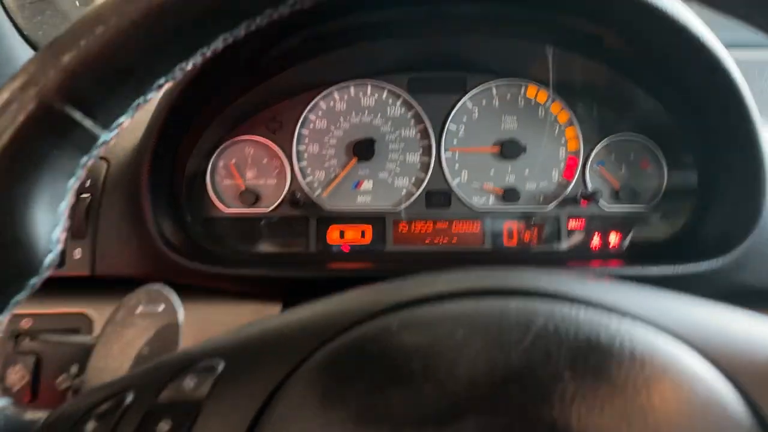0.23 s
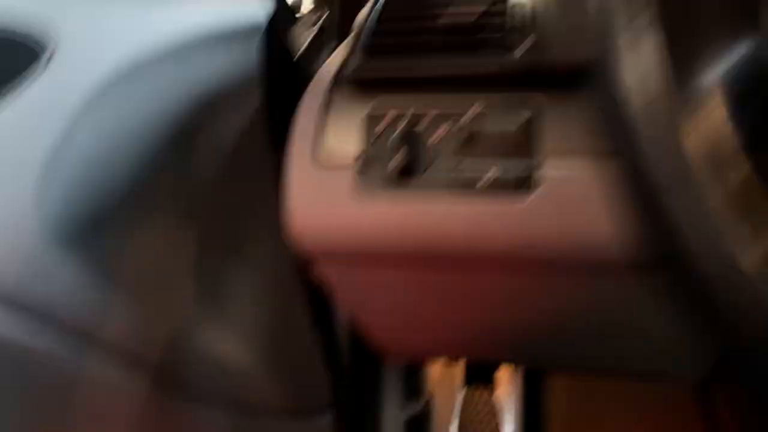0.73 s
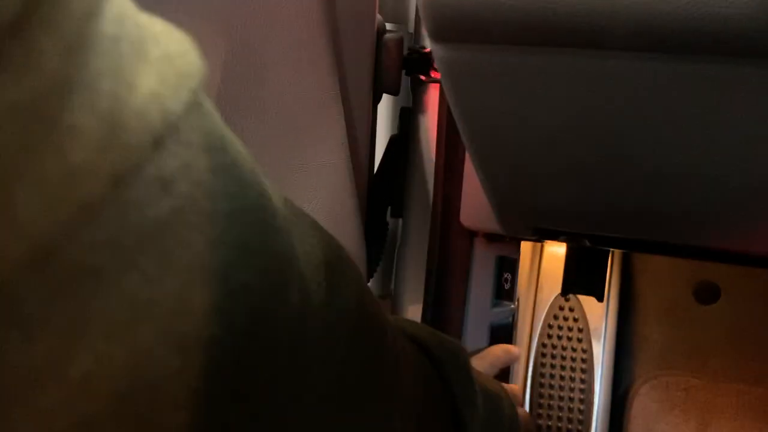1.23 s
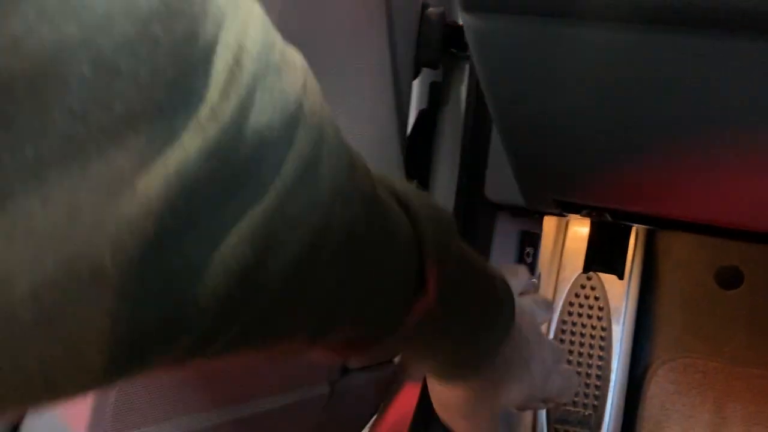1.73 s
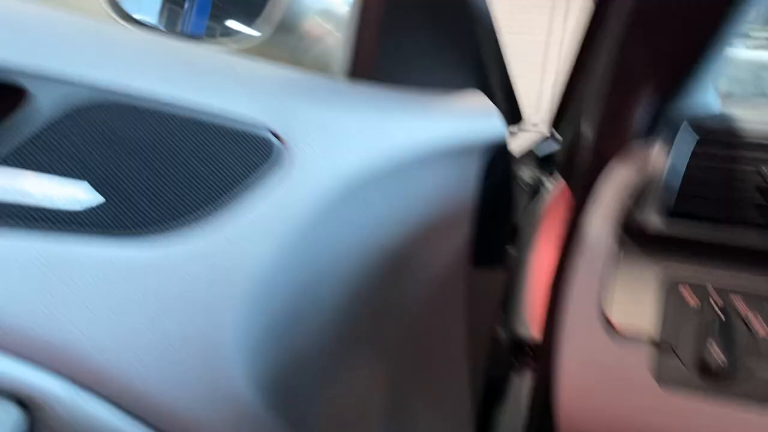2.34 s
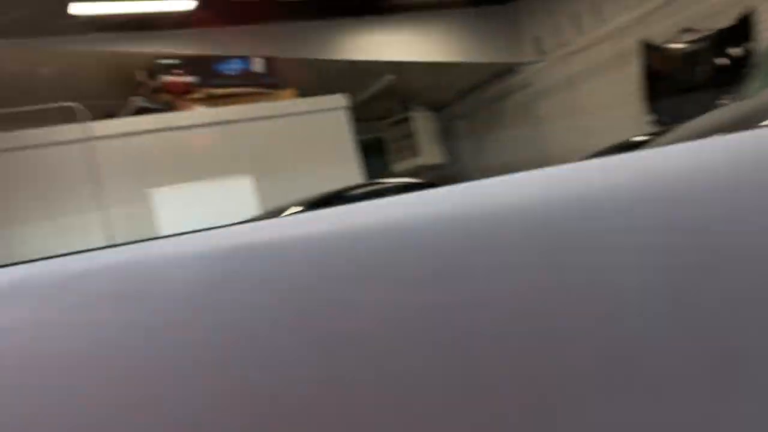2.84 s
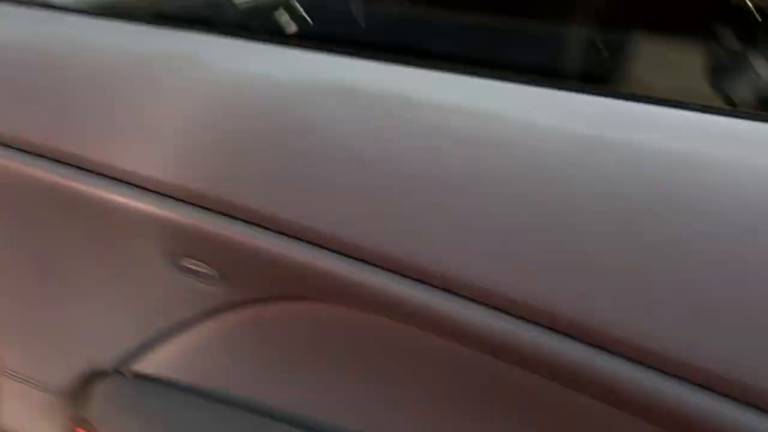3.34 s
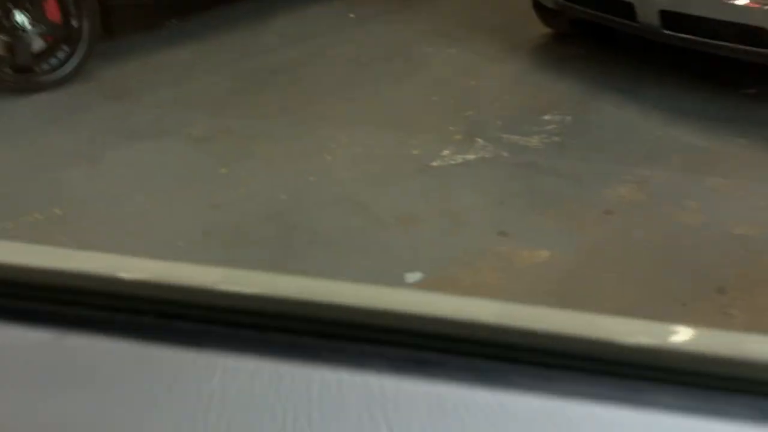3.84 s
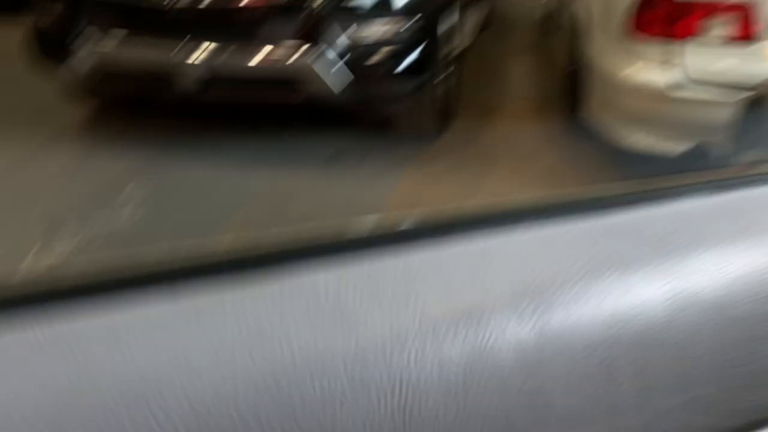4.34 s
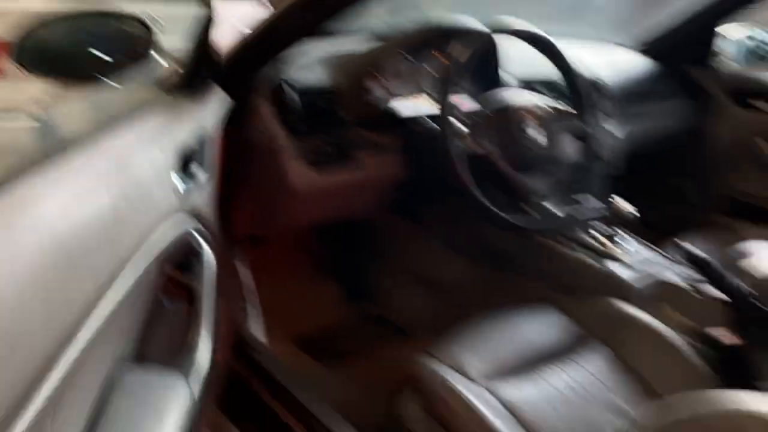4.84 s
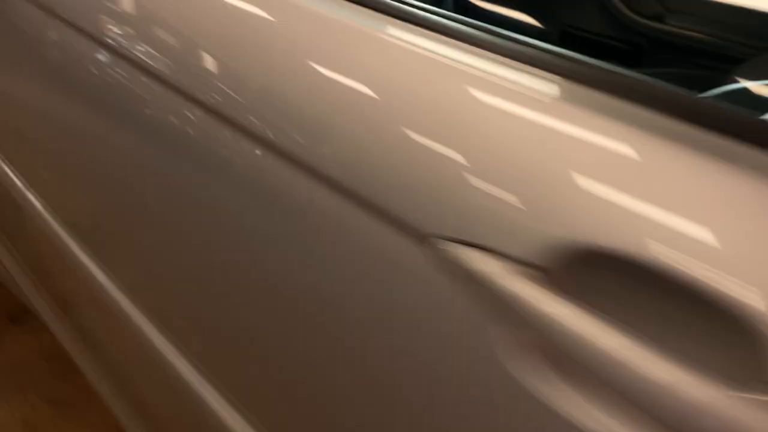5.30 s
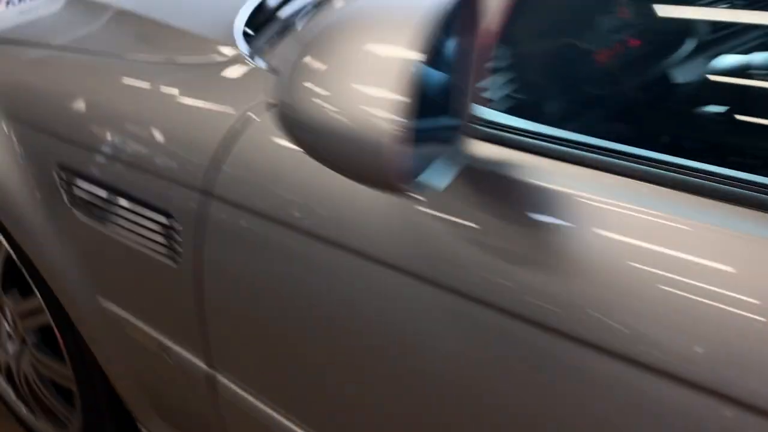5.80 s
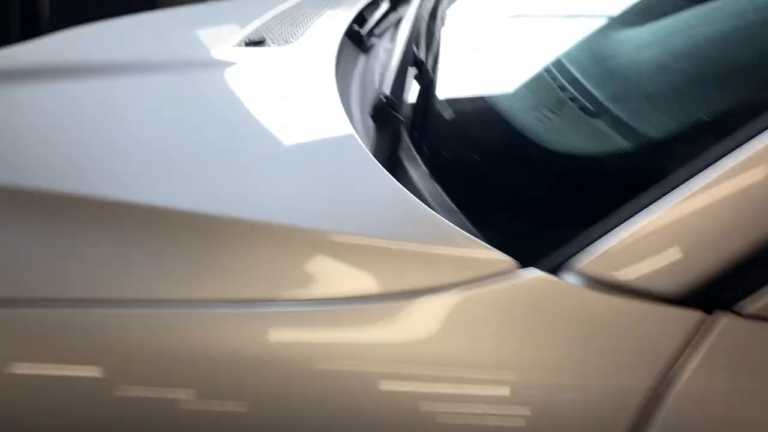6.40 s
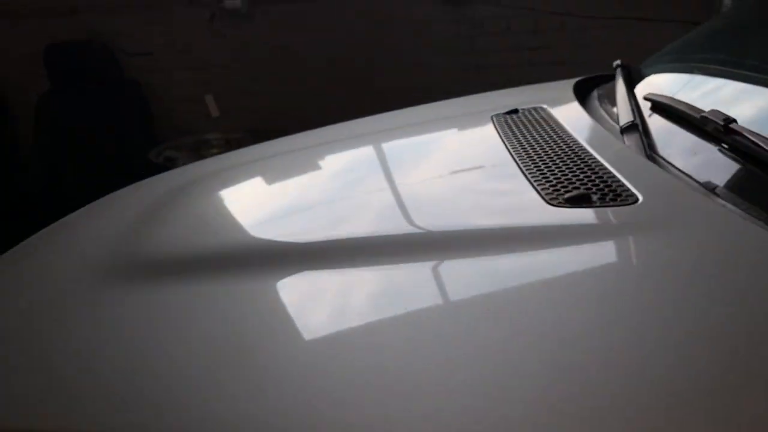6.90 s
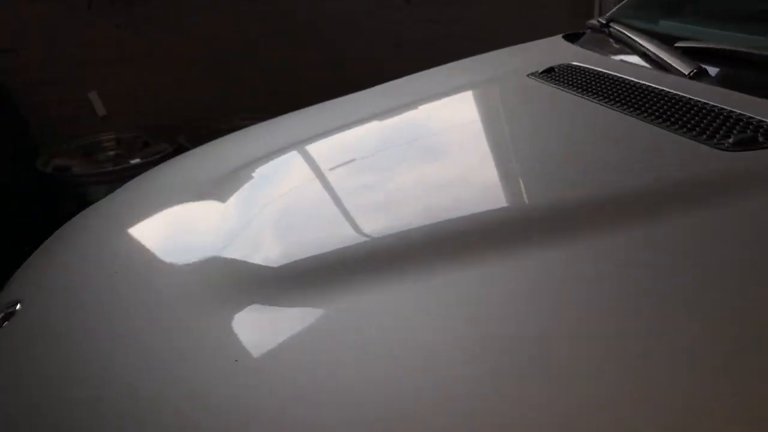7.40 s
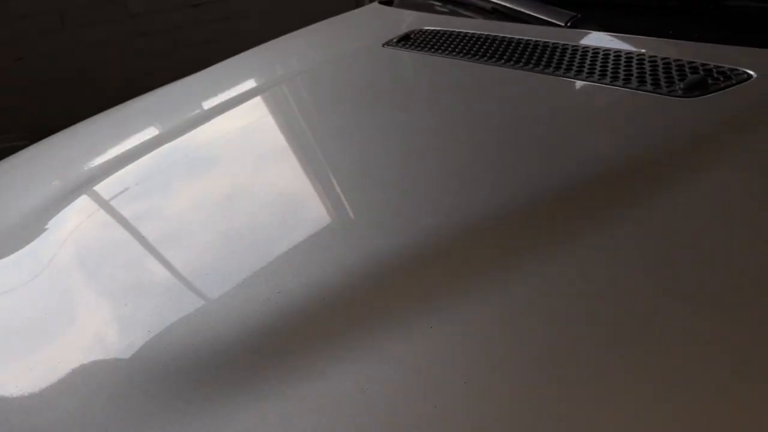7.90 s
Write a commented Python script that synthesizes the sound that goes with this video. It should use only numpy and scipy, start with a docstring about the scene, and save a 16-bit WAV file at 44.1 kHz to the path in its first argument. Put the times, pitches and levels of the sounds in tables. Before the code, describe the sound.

A car engine idles with a deep hum while a hood release snaps, a door slams, and the engine turns brighter outside.

```python
"""Idling straight-six, seat to bonnet.

A straight-six idles in a workshop while a phone is carried from the driver's seat round to the bonnet.
A sleeve brushes the trim, the bonnet lever creaks and snaps, the door is knocked and then slammed.
The firing boom fills the car; outside, the valve gear brightens and the belt whistles.
The phone's limiter ducks after the loud blows."""
import sys
import numpy as np
from scipy import signal
from scipy.fft import rfft, irfft, next_fast_len
from scipy.io import wavfile
from scipy.ndimage import uniform_filter1d, minimum_filter1d, map_coordinates

SR = 44100
rng = np.random.default_rng(int(sys.argv[2]) if len(sys.argv) > 2 else 0)


def transcribe(u):
    """Save the signal u as a 16-bit wav file named by the first command-line argument.

    u: samples, shape (n,) or (channels, n), limited to [-1, 1]; the rate is SR.
    q: integer samples, one column per channel.
    """
    v = np.clip(np.atleast_2d(u).T, -1, 1)
    q = np.round(v * 32767).astype(np.int16)
    wavfile.write(sys.argv[1], SR, q)


N = 359415
TIME = np.arange(N) / SR
SIDES = np.array([[1], [-1]])  # left, right

# The phone's path. Each row: time in seconds, mechanical noise in dB, nearness to the bonnet 0-1.
WALK = [(0, -49, 0.52), (.45, -49, 0.17), (.8, -43, 0.03), (1.4, -46, 0.14), (2.3, -41.5, 0.08),
        (3.2, -41.5, 0.06), (3.7, -44, 0.6), (4.4, -42.5, 0.43), (5.2, -41.5, 0.52), (5.9, -40, 0.52),
        (7.2, -40, 0.96), (8.15, -39.5, 1)]


def exhaust(firings):
    """The firing tone and its orders, body shudder, and a rumble that puffs at each firing."""
    # Firing tone along the walk. Each row: time in seconds, level in dB.
    boom_levels = [(0, -18.5), (.3, -18), (.75, -24.5), (1.25, -20), (1.65, -26.5), (1.9, -48),
                   (2.25, -20.5), (2.55, -28.5), (2.85, -21.5), (3.35, -19.5), (4.3, -21), (5.45, -17),
                   (5.9, -22), (6.7, -18), (7, -19.5), (7.5, -17.5), (8.15, -18.5)]
    # Overtones. Each row: multiple of the firing rate, cabin level in dB, bonnet level in dB.
    overtones = [(2, -38, -43), (2.5, -40.5, -30), (3, -34, -38), (4, -47.5, -48), (5, -47.5, -45)]
    # Uneven cylinders and belt-driven pumps. Each row: multiple of the firing rate, level in dB.
    weak_orders = [(.5, -56), (1.499, -49), (3.5, -50.5), (4.5, -53.5), (5.34, -51), (5.5, -62.5),
                   (6, -57.5), (6.36, -54.5), (7.78, -60.5)]
    # Rumble spectrum. Each row: frequency in Hz, level in dB.
    rumble_shape = [(18, -54), (31, -26), (44, -16), (75, -13.5), (107, -15), (167, -26), (217, -13),
                    (291, -22.5), (420, -28), (600, -32), (780, -68), (1320, -120)]
    # The left port hears the exhaust later. Each row: frequency in Hz, lag in radians.
    left_lag = [(57, 0.52), (170, 0.78), (280, 0.96), (420, 1.47)]
    level_db, near = curves(WALK)
    shudder = amp(-26) * (1 - near ** 3) * noise(hump(centre_hz=78, octaves=0.52), spread=0.12)[0]
    boom = amp(curves(boom_levels)[0]) * (tone(firings, flutter_db=0.5, drift_rad=0.0075) + shudder)
    for order, cabin_db, bonnet_db in overtones:
        # Unequal cylinders throb once per six firings.
        lope = 1 + 0.23 * np.cos(2 * np.pi * (firings / 6 + rng.random()))
        db = cabin_db + (bonnet_db - cabin_db) * near ** 3 + standing_wave_db(order)
        db += 0.16 * wobble(3.16)
        boom += amp(db) * lope * tone(order * firings, flutter_db=1.7, drift_rad=0.024)
    for order, db in weak_orders:
        boom += amp(db + standing_wave_db(order)) * tone(order * firings, flutter_db=4, drift_rad=0.16)
    puffs = 1 + 0.5 * np.cos(2 * np.pi * firings)
    footwell_db = 11.5 * passing(at_s=1.48, half_s=0.87)  # rumble gathers under the dashboard
    rumble = unit(puffs * noise(lambda f: along(rumble_shape, f), spread=0.18))
    rumble *= amp(level_db + 0.3 + footwell_db)
    left_db = -5.5
    return filtered(boom + rumble,
                    lambda f: amp(SIDES * left_db / 2) * np.exp(-0.5j * SIDES * along(left_lag, f)))


def standing_wave_db(order):
    """An engine order swells or sinks as the phone moves through its standing wave."""
    # Loud and dead spots. Each row: order to the nearest half, time and half length in seconds, gain in dB.
    spots = [(2, .05, 0.46, -18), (2, 2.26, 0.28, -5), (2, 6.28, 0.61, 11.5), (2, 8.06, 0.55, 11.5),
             (3, 0.52, 0.23, -15.5), (3, 1.02, 0.41, 4), (4, 1.21, 0.43, 8.5), (4, 3.26, 0.45, 3.5),
             (4, 6.9, 0.49, 13), (4.5, 6.65, 0.89, 6), (5, 0.032, 0.23, 6.5), (5, 4.35, 0.25, 6),
             (5.5, 5.38, 0.58, 8), (5.5, 0.42, 0.75, -12), (6.5, 1.23, 0.53, 12.5), (6.5, 5.4, 0.85, 9.5)]
    return sum(db * passing(at_s, half_s) for multiple, at_s, half_s, db in spots
               if round(2 * multiple) == round(2 * order))


def machinery(firings):
    """Fan and belt rush, valve clatter and pulley whines open up towards the bonnet."""
    # Rush at the seat. Each row: frequency in Hz, level in dB.
    cabin_shape = [(150, -28), (400, -1.5), (600, -6.5), (1000, -6), (1500, -9.5), (2100, -10), (3000, -15),
                   (4500, -15), (6000, -22), (10000, -21), (15500, -25)]
    # Rush at the bonnet. Each row: frequency in Hz, level in dB.
    bay_shape = [(150, -44), (400, -6), (600, -4.5), (750, -7.5), (1100, -6), (1800, -7.5), (2800, -12),
                 (4200, -12.5), (5500, -20), (10000, -16.5), (15500, -21)]
    # Microphone pair. Each row: frequency in Hz, likeness 0-1, left lead in radians, left level in dB.
    engine_ports = [(300, 0.18, 6, -10.5), (645, 0.68, 2, -3), (1060, 0.64, 1.8, -1.5),
                    (1850, 0.15, 4.34, -4.5), (3870, 0.11, 12.13, -2), (6530, 0.33, 19.4, -4),
                    (8000, 0.13, 23, -3), (8840, 0.85, 20.6, 0.5), (9920, 0.8, 19.56, -1),
                    (12100, 0.83, 15.3, 0), (13100, .94, 13.9, 2), (14000, 1, 13.5, -1)]
    level_db, near = curves(WALK)
    rush = np.sqrt(1 - near) * hiss(cabin_shape) + np.sqrt(near) * hiss(bay_shape)
    valves = amp(-6 + 2.5 * near) * valve_gear(firings)
    clatter = amp(level_db + 0.28 * wobble(4)) * (rush + valves)
    whine = near ** 2 * pulleys(firings)
    diffuse = ports(reflected(clatter, patchy_db=2.5), engine_ports)
    return diffuse + place(whine + belt(near), left_db=-3, lead_ms=0.053)


def valve_gear(firings, pattern_db=5, scatter_db=4, t60_s=0.055):
    """Twelve valves, each with its own strength, close once per six firings and ring the head."""
    # Block and valve cover modes. Each row: frequency in Hz, width in Hz, gain in dB.
    head_modes = [(569, 32, 5.5), (892, 36, -1.5), (1380, 110, -0.5), (1630, 75, -0.5), (1800, 19, -0.5),
                  (2160, 53, -6), (2504, 46, -4.5), (2836, 56, -4.5), (4360, 2000, -17.5)]
    closing = np.floor(2 * firings + 0.015 * wobble(110)).astype(int)
    at = np.flatnonzero(np.diff(closing))
    valve_db = pattern_db * rng.uniform(-1.7, 1, size=12)
    taps = np.zeros(N)
    taps[at] = amp(valve_db[closing[at] % 12] + scatter_db * rng.uniform(-1.8, 1, len(at)))
    envelope = signal.fftconvolve(taps, decay(TIME[:SR // 20], t60_s))[:N]
    rattle = envelope * rng.standard_normal((2, N))
    return unit(sum(amp(1.2 * wobble(7)) * ring(rattle, [mode]) for mode in head_modes))


def pulleys(firings, fade_db=9):
    """Belt-driven parts whine, each weaker away from its own place."""
    # Whines. Each row: multiple of the firing rate, level in dB, closest approach in seconds.
    whines = [(10.22, -52, 7.8), (10.62, -53.5, 6.9), (14.72, -54.5, 7.44), (16.04, -51.5, 6.71),
              (19.1, -59, 7.3), (22, -63.5, 7.2), (23.2, -56.5, 6.45), (24.4, -55, 7.4), (24.8, -61, 6.6),
              (28.9, -54, 6.8), (29.9, -62, 7.0), (31.6, -57.5, 7.2), (38.44, -57, 7.5)]
    out = np.zeros(N)
    for order, db, nearest_s in whines:
        gain = amp(db + fade_db * (passing(nearest_s, half_s=0.53) - 1) + 1.1 * wobble(4))
        out += gain * tone(order * firings, flutter_db=2.5, drift_rad=0.6)
    return out


def belt(near, flap_hz=15, chirps_per_s=13):
    """The drive belt whistles, flaps, and chirps as it slips on its pulleys."""
    # Whistle. Each row: time in seconds, pitch in Hz, level in dB.
    whistle = [(2.8, 2180, -76), (4.2, 2168, -58), (5.3, 2170, -61), (5.9, 2194, -57), (7.1, 2175, -59),
               (7.45, 2160, -60), (7.58, 2145, -48), (7.79, 2145, -48.5), (8.15, 2146, -47)]
    # Clearest chirps. Each row: centre in seconds, level in dB, half length in seconds, pitch in Hz.
    chirps = [(3.28, -48.5, .04, 2180), (3.46, -48.5, .022, 2180), (7.0, -49, 0.047, 2190),
              (7.155, -49, .04, 1810), (7.271, -45, 0.023, 1770), (7.92, -55, .1, 2845)]
    hz, db = curves(whistle)
    flap = 1 + 0.36 * np.sin(2 * np.pi * flap_hz * TIME + 1.7 * wobble(14))
    cycles = np.cumsum(hz + 15 * wobble(90)) / SR
    out = amp(db) * flap * tone(cycles, flutter_db=0.3, drift_rad=0.35)
    for at_s, db, half_s, hz in chirps:
        add(out, at_s - 2 * half_s, chirp(db, half_s, hz, octaves_per_s=0))
    # Fainter ones come at random outside the car.
    for when, strength, length, pitch, glide in rng.uniform(-1, 1, (int(chirps_per_s * N / SR), 5)):
        at = int((when + 1) / 2 * (N - 1))
        sound = chirp(db=-54 - 4 * strength, half_s=0.0216 * 2 ** (length / 2),
                      hz=1604 * 2 ** (0.39 * pitch), octaves_per_s=1.23 * glide)
        add(out, at / SR, min(1.64 * near[at], 1) ** 3 * sound)
    return out


def chirp(db, half_s, hz, octaves_per_s):
    """One belt slip: a short, slightly rough squeak."""
    t = np.arange(-2 * half_s, 2 * half_s, 1 / SR)
    phase = 2 * np.pi * np.cumsum(hz * 2 ** (octaves_per_s * t)) / SR + 0.37 * wobble(162, len(t))
    return np.sqrt(2) * amp(db) * np.exp(-(t / half_s) ** 2) * np.sin(phase)


def door_latch(spring_octaves=0.9, attack_s=0.00046):
    """The sprung steel latch strikes, then snaps home: two quick bursts of contacts."""
    # Contacts. Each row: start in seconds, level in dB, t60 in seconds, spring ring in dB, its pitch in Hz.
    contacts = [(5.508, -5.5, 0.058, 7.5, 3000), (5.515, -3.5, 0.059, 8, 5660),
                (5.523, -6.5, 0.084, 3, 3800), (5.529, -9, 0.067, 5, 500), (5.545, -5.5, 0.043, 11, 9000),
                (5.548, -6.5, .06, 7.5, 3400), (5.555, -15.5, 0.22, 2.5, 3600)]
    # Steel spectrum. Each row: frequency in Hz, level in dB.
    steel = [(150, 7), (300, 4), (800, -2), (1700, -5.5), (2600, -7.5), (4000, -11), (6300, -16.5),
             (8000, -19), (10200, -17), (15500, -23)]
    out, t = np.zeros((2, N)), TIME[:SR // 4]
    for start_s, db, t60_s, ring_db, spring_hz in contacts:
        spring = lambda f: ring_db * np.exp(-(np.log2((f + 1) / spring_hz) / spring_octaves) ** 2)
        burst = noise(lambda f: along(steel, f) + spring(f), spread=1, size=len(t))
        add(out, start_s, amp(db) * decay(t, t60_s) * (1 - np.exp(-t / attack_s)) * burst)
    return out


def bodywork():
    """Blows ring the door panel and thud through the body shell."""
    # Blows on the door. Each row: start in seconds, level in dB.
    knocks = [(1.727, -17), (1.79, -23.5), (3.911, -2.5), (3.989, -25), (4.018, -24), (4.044, -22),
              (5.509, -8.5), (5.54, -7.5), (5.572, -20)]
    # Door panel modes. Each row: frequency in Hz, width in Hz, gain in dB.
    panel_modes = [(198, 21, 5), (246.2, 18, 7.5), (408, 28, 3.5), (530, 29, 3), (656, 51, 0.5),
                   (914, 32, -9.5)]
    # Blows on the shell. Each row: start in seconds, level in dB.
    thuds = [(1.745, -12), (1.842, -13), (3.915, -12), (4.0, -13.5), (4.052, -12.5), (5.52, -17),
             (5.539, -4.5), (5.557, -10)]
    # Shell modes. Each row: frequency in Hz, width in Hz, gain in dB.
    shell_modes = [(70.6, 12, -0.5), (94, 28.2, 1), (163, 33, -8), (257.5, 19, -5.5), (390, 185, -12.5)]
    door = blows(knocks, panel_modes, rattle=0.12, rebound_s=0.0165)
    return door + blows(thuds, shell_modes, rattle=0.29, rebound_s=0.017)


def blows(rows, modes, rattle, rebound_s, rebound_db=-0.5):
    """Each blow rings a body, rattles loose trim, and lands again as the part springs back."""
    out, t = np.zeros(N), TIME[:SR // 3]
    for start_s, db in rows:
        for delay_s, loss_db in ((0, 0), (rebound_s, rebound_db)):
            push = np.exp(-t / 0.0025) + rattle * rng.standard_normal(len(t)) * decay(t, t60_s=0.46)
            sound = ring(push, modes)
            add(out, start_s + delay_s, amp(db + loss_db) * sound / np.abs(sound).max())
    return out


def bonnet_catch():
    """The catch lets go in a rush of contacts that ring the lever's steel bracket."""
    # Contacts. Each row: start in seconds, level in dB.
    contacts = [(1.921, -11), (1.928, -8.5), (1.931, 16), (1.934, 14.5), (1.9375, 11.5)]
    # Bracket modes. Each row: frequency in Hz, width in Hz, gain in dB.
    bracket_modes = [(168, 100, -1), (300, 147, -1.5), (526, 95, 0.5), (1351, 180, -4), (1740, 125, -1),
                     (2130, 150, -4.5), (2620, 140, 1.5), (3460, 380, -8.5), (4430, 1100, -17),
                     (9000, 7200, -26.5)]
    return place(struck(contacts, bracket_modes, buzz=0.28, buzz_t60_s=0.033), left_db=-6)


def bonnet_cable(sag_octaves_per_s=1.53):
    """The cable sticks and slips in rough squeaks, each sinking as the slip slows."""
    # Squeaks. Each row: centre in seconds, level in dB, half length in seconds, tilt in dB per octave.
    creaks = [(1.553, -38, 0.0051, -2), (1.603, -34.5, 0.017, -5), (1.63, -35, 0.015, 3),
              (1.677, -41.5, 0.021, 6), (1.731, -29, .011, -3), (1.771, -34.5, 0.016, -18)]
    # Cable tones. Each row: frequency in Hz, level in dB.
    partials = [(1385, 5), (1680, 1), (2580, -6.5), (2980, -13)]
    out = np.zeros(N)
    for at_s, db, half_s, tilt_db in creaks:
        t = np.arange(-2 * half_s, 2 * half_s, 1 / SR)
        wander = 1 + 0.026 * wobble(716, len(t)) + 0.0254 * wobble(60, len(t))
        slip = np.cumsum(2 ** (-sag_octaves_per_s * t) * wander) / SR
        squeak = sum(amp(partial_db + tilt_db * np.log2(hz)) * np.sin(2 * np.pi * hz * slip)
                     for hz, partial_db in partials)
        rough = unit(squeak * amp(2.5 * wobble(340, len(t))))
        add(out, at_s - 2 * half_s, amp(db) * np.exp(-(t / half_s) ** 2) * rough)
    return place(out, left_db=-7)


def trim_snap(start_s=2.5876, db=-6):
    """A plastic fastener lets go and rings the door trim."""
    # Trim modes. Each row: frequency in Hz, width in Hz, gain in dB.
    trim_modes = [(610, 230, -7.5), (1050, 250, -6), (1300, 150, 0.5), (2200, 290, 3), (3370, 580, -6),
                  (4800, 540, -8), (9000, 5400, -13)]
    return struck([(start_s, db)], trim_modes, buzz=0.16, buzz_t60_s=0.037)


def struck(rows, modes, buzz, buzz_t60_s):
    """Hard contacts, each with a brief buzz, ring a body."""
    out, t = np.zeros((2, N)), TIME[:SR // 8]
    for start_s, db in rows:
        push = (t == 0) + buzz * rng.standard_normal((2, len(t))) * decay(t, buzz_t60_s)
        sound = ring(push, modes)
        add(out, start_s, amp(db) * sound / np.abs(sound).max())
    return out


def handling(snags_per_s=27):
    """Taps on plastic, and grainy strokes of cloth and hand that snag on trim and door seal."""
    # Taps. Each row: start in seconds, level in dB, centre in Hz.
    taps = [(0.27, -33.5, 5700), (0.2966, -29, 1180), (.7133, -36.5, 1560), (0.772, -26, 1170),
            (.8355, -34, 1700), (0.843, -34, 8000), (0.895, -30.5, 1090), (.9318, -39, 1120),
            (0.949, -34, 2200), (.967, -43, 7000), (1.012, -29.5, 940), (1.107, -29, 4500),
            (1.14, -30, 900), (1.158, -31, 2400), (1.2246, -15, 2100), (1.3712, -30.5, 950),
            (1.567, -27, 1610), (1.59, -29, 1710), (1.720, -25, 2020), (2.174, -26, 890), (2.235, -33, 850),
            (2.254, -32, 950), (2.273, -28.5, 930), (2.296, -37, 1050), (2.33, -33, 1100),
            (2.359, -37, 1300), (2.395, -30, 1900), (2.422, -31, 900), (2.442, -32, 950),
            (2.677, -34.5, 3000), (2.787, -36, 1000), (2.9181, -28, 920), (2.968, -34, 1800),
            (3.2296, -31, 2200), (3.915, -21.5, 550), (3.9903, -26.5, 794), (4.702, -31, 1100)]
    # Strokes. Each row: time in seconds, level in dB, half length in seconds, centre in Hz, width in octaves.
    strokes = [(0.865, -42.5, 0.088, 1630, 1.2), (1.156, -40, 0.058, 1880, 2.2),
               (1.621, -46, 0.04, 1960, 0.69), (1.769, -36.5, 0.053, 700, 0.64),
               (2.283, -43, 0.14, 900, 0.33), (2.421, -45.5, 0.037, 3200, 0.7),
               (2.92, -50, 0.088, 1820, 0.59), (3.918, -36.5, 0.0091, 3180, 0.3),
               (4.007, -25, .011, 4900, 1.7), (4.023, -30.5, .023, 4070, 1.4),
               (4.569, -36.5, 0.054, 2200, 1.8), (4.721, -38, 0.059, 1100, 0.19),
               (4.76, -44, 0.12, 4530, 4.1), (6.056, -41.5, 0.016, 2290, 0.48)]
    out = np.zeros((2, N))
    for start_s, db, hz in taps:
        add(out, start_s, click(db, hz))
    for at_s, db, half_s, hz, octaves in strokes:
        swell = np.exp(-np.arange(-2, 2, 1 / (half_s * SR)) ** 2)
        grain = amp(2.3 * wobble(153, len(swell)))
        friction = noise(hump(hz, octaves), spread=1, size=len(swell))
        add(out, at_s - 2 * half_s, amp(db) * swell * grain * friction)
        for when, strength, pitch in rng.uniform(-1, 1, (int(2 * half_s * snags_per_s), 3)):
            add(out, at_s + half_s * when, click(db + 3 + 4.5 * strength, hz * 2 ** (0.3 * pitch)))
    return out


def click(db, hz, attack_s=0.0006):
    """A tick of plastic: a short body, the trim's low answer, and a crack that grows with pitch."""
    t = TIME[:SR // 8]
    body = noise(hump(hz, 0.55), spread=0.86, size=len(t))
    answer = amp(-5.5) * noise(hump(580, 0.99), spread=0.62, size=len(t))
    crack = noise(hump(6200, 1), spread=0.84, size=len(t))
    crack *= amp(-5) * decay(t, t60_s=0.018) * min(hz / 2200, 1) ** 2
    t60_s = 0.052 * (hz / 1000) ** -0.38  # higher clicks die sooner
    return amp(db) * (1 - np.exp(-t / attack_s)) * (decay(t, t60_s) * (body + answer) + crack)


def reflected(x, patchy_db):
    """Bounces off floor and bodywork lift and dim patches of the spectrum as the phone moves."""
    hz, _, spectra = signal.stft(x, SR, nperseg=512)
    patches = uniform_filter1d(rng.standard_normal(spectra.shape[1:]), size=3, axis=0)
    patches = unit(uniform_filter1d(patches, size=24, axis=1))
    depth_db = patchy_db / (1 + (hz[:, None] / 3500) ** 2)  # the high hiss stays smooth
    return signal.istft(spectra * amp(depth_db * patches), nperseg=512)[1][:, :N]


def workshop_echo(x):
    """A diffuse tail that dies sooner in the treble."""
    # Room decay. Each row: frequency in Hz, t60 in seconds.
    room_t60 = [(100, 0.64), (1500, 0.2), (10000, 0.21)]
    hz, t, spectra = signal.stft(rng.standard_normal((2, SR // 2)), SR, nperseg=256)
    tail = signal.istft(spectra * decay(t, along(room_t60, hz)[:, None]), SR, nperseg=256)[1]
    return signal.fftconvolve(x, tail / np.linalg.norm(tail[0]), axes=1)[:, :N]


def ports(pair, table):
    """Two sounds blend into the left and right of one diffuse source."""
    hz, *columns = np.transpose(table)

    def mix(f):
        """Each sound's gain at each microphone port."""
        alike, lead_rad, left_db = (np.interp(np.log(f + 1), np.log(hz), c) for c in columns)
        turn = np.arccos(np.clip(alike, 0, 1)) / 2
        left = amp(left_db / 2) * np.exp(0.5j * lead_rad)
        return np.array([[left * np.cos(turn), left * np.sin(turn)],
                         [np.cos(turn) / left, -np.sin(turn) / left]])
    return filtered(pair, mix).sum(axis=1)


def place(x, left_db, lead_ms=0):
    """Set the left port's level and lead against the right."""
    return filtered(x, lambda f: amp(SIDES * left_db / 2) * np.exp(1j * np.pi * f * SIDES * lead_ms / 1000))


def limiter(x, top_db, hold_s, release_db_per_s, depth_db):
    """The gain drops just before a peak, holds, and climbs back."""
    need_db = np.clip(top_db - 20 * np.log10(np.abs(x).max(axis=0) + 1e-6), -depth_db, 0)
    ahead, half_hold = int(0.0015 * SR), int(hold_s * SR / 2)
    need_db = minimum_filter1d(need_db, 2 * ahead + 1)
    held_db = minimum_filter1d(need_db, 2 * half_hold + 1, origin=half_hold)
    climb_db = release_db_per_s * TIME
    gain_db = np.minimum.accumulate(held_db - climb_db) + climb_db
    return x * amp(uniform_filter1d(gain_db, 2 * ahead + 1))


def amp(db):
    """Decibels to gain."""
    return 10 ** (np.asarray(db) / 20)


def decay(t, t60_s):
    """Falls 60 dB in t60_s."""
    return amp(-60 * t / t60_s)


def unit(x):
    """Scale to rms 1."""
    return x / np.sqrt(np.mean(x ** 2) + 1e-20)


def along(points, hz):
    """Read (Hz, value) points on a log axis."""
    f, values = np.transpose(points)
    return np.interp(np.log(hz + 1), np.log(f + 1), values)


def curves(rows):
    """One value per sample for each column after the time."""
    times_s, *columns = np.transpose(rows)
    return [np.interp(TIME, times_s, c) for c in columns]


def passing(at_s, half_s):
    """Rises to 1 and falls as the phone passes a place."""
    return np.exp(-((TIME - at_s) / half_s) ** 2)


def wobble(knots_per_s, size=N):
    """A smooth random curve."""
    knots, t = rng.standard_normal(int(size * knots_per_s / SR) + 4), TIME[:size]
    return np.interp(t, t[::32], map_coordinates(knots, [t[::32] * knots_per_s]))


def tone(cycles, flutter_db, drift_rad):
    """A sine of rms near 1 whose strength and phase waver."""
    strength = np.sqrt(2) * amp(flutter_db * wobble(18))
    return strength * np.sin(2 * np.pi * (cycles + rng.random()) + drift_rad * wobble(9))


def filtered(x, response):
    """x through a complex frequency response."""
    n = x.shape[-1]
    padded = next_fast_len(n + SR // 4)
    return irfft(rfft(x, padded) * response(np.fft.rfftfreq(padded, 1 / SR)), padded)[..., :n]


def ring(x, modes):
    """x through a body's resonances, alternating in sign."""
    return filtered(x, lambda f: sum((-1) ** k * amp(db) * 1j * f * width / (hz**2 - f**2 + 1j * f * width)
                                     for k, (hz, width, db) in enumerate(modes)))


def noise(shape_db, spread, size=N):
    """Stereo noise of rms 1; spread is the side-to-mid ratio."""
    mid, side = filtered(rng.standard_normal((2, size)), lambda f: amp(shape_db(f)))
    return unit(np.array([mid + spread * side, mid - spread * side]))


def hiss(spectrum):
    """Two unrelated noises of rms 1."""
    return unit(filtered(rng.standard_normal((2, N)), lambda f: amp(along(spectrum, f))))


def hump(centre_hz, octaves):
    """A broad resonance in dB, steeper on the treble side."""
    return lambda f: (-10 * np.log10(1 + (np.log2((f + 1) / centre_hz) / octaves) ** 4)
                      - 2 * np.log2(1 + f / centre_hz))


def add(track, start_s, sound):
    """Mix a sound into the track."""
    part = track[..., round(start_s * SR):][..., :sound.shape[-1]]
    part += sound[..., :part.shape[-1]]


def scene():
    """The idling engine, and the driver's doings in the workshop's echo."""
    # The idle hunts. Each row: time in seconds, firings per second.
    idle_speed = [(0, 57.5), (.22, 57.9), (.58, 55.8), (.8, 57.7), (1.2, 58.2), (1.75, 56.2), (2.25, 58.3),
                  (2.6, 58.1), (3.05, 56.6), (3.6, 57.8), (4.45, 57.0), (5.1, 57.1), (5.6, 58.2),
                  (6.17, 56.0), (6.5, 56.8), (7.08, 57.6), (7.45, 57.0), (8.15, 56.9)]
    # Microphone pair, close up. Each row: frequency in Hz, likeness 0-1, left lead in radians, left dB.
    close_ports = [(100, 0.85, 0, -4.5), (279, 0.8, 0.13, -6.5), (470, 0.32, -3.5, -6.5),
                   (1000, 0.35, -4, -1), (2000, 0.089, -4.5, -5), (4000, 0.15, -5.5, -4),
                   (8000, 0.175, -5, -2)]
    firings = np.cumsum(curves(idle_speed)[0]) / SR
    close = handling() + trim_snap() + door_latch()
    close[0] += bodywork()  # one body, shared by both ports
    events = ports(close, close_ports) + bonnet_cable() + bonnet_catch()
    outside = curves(WALK)[1]  # the cabin soaks up the echo until the phone leaves it
    return exhaust(firings) + machinery(firings) + events + amp(-4) * workshop_echo(outside * events)


def record(dry, ceiling=0.92, top_hz=15750):
    """The phone's treble response, limiter, soft overload and band limit."""
    # Treble response. Each row: frequency in Hz, gain in dB.
    treble = [(4500, 0), (6000, -2), (8000, -3), (10000, 0.5), (11300, -2), (12200, -12.5), (13500, -9),
              (15500, -18)]
    heard = filtered(dry, lambda f: amp(along(treble, f)))
    limited = limiter(heard, top_db=2.5, hold_s=0.093, release_db_per_s=145, depth_db=17.5)
    rounded = limited / (1 + (limited / ceiling) ** 8) ** (1 / 8)
    return filtered(rounded, lambda f: f < top_hz)


dry = scene()
out = record(dry)
transcribe(out)
```